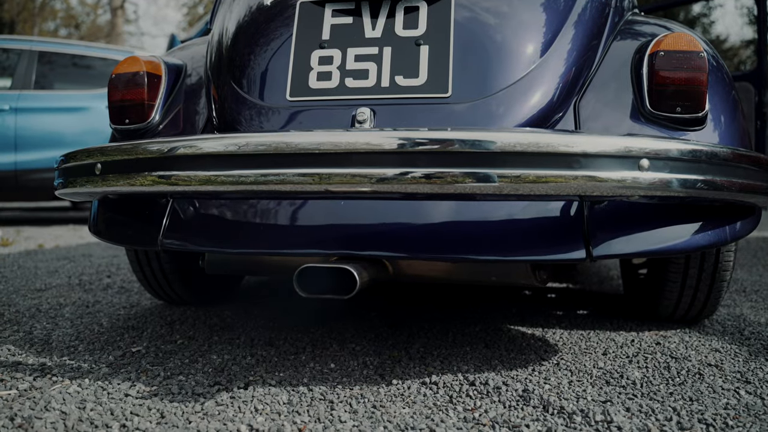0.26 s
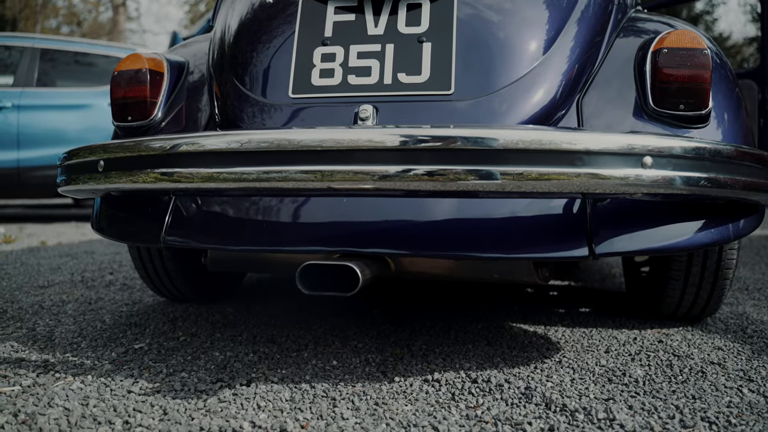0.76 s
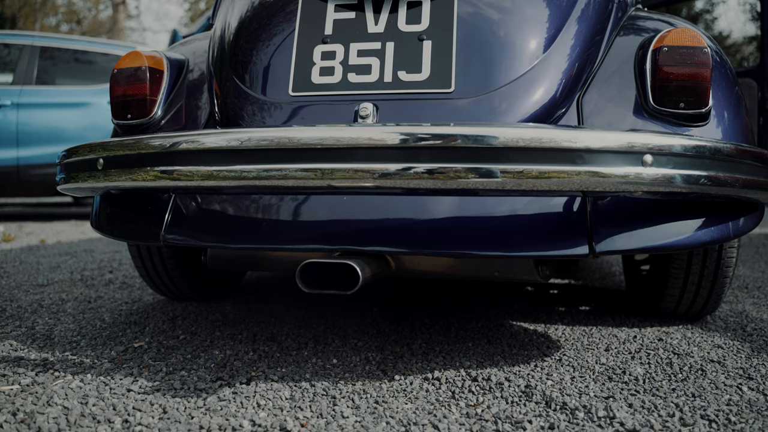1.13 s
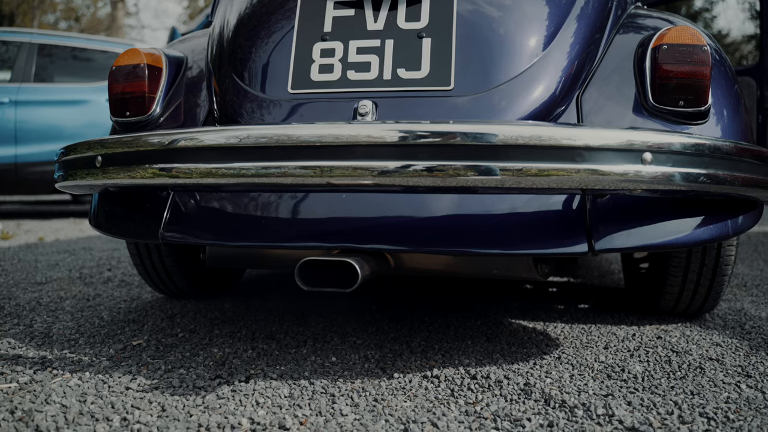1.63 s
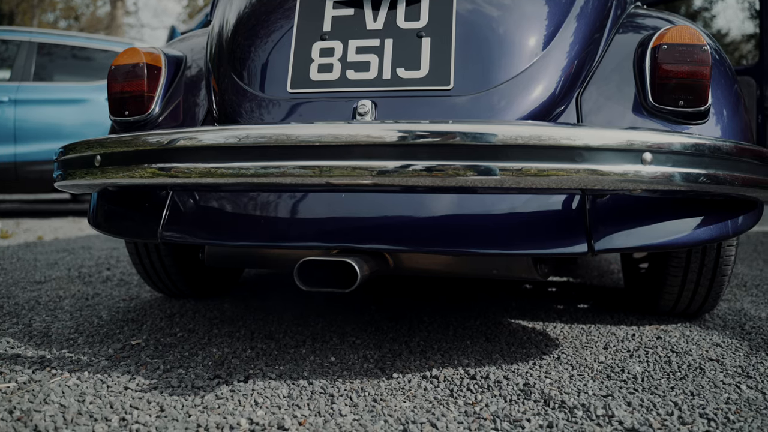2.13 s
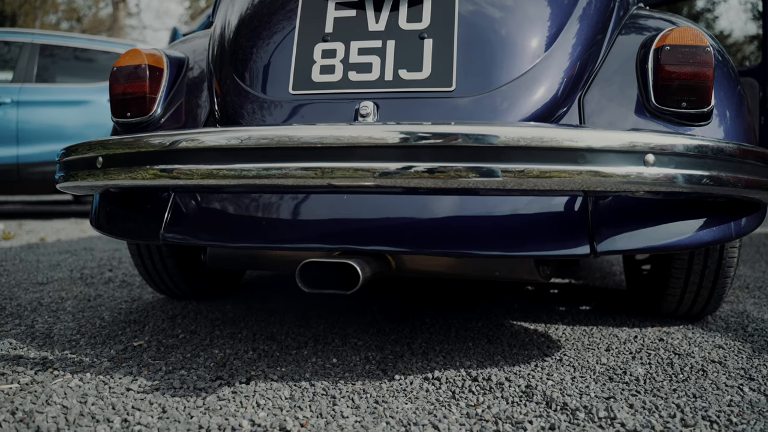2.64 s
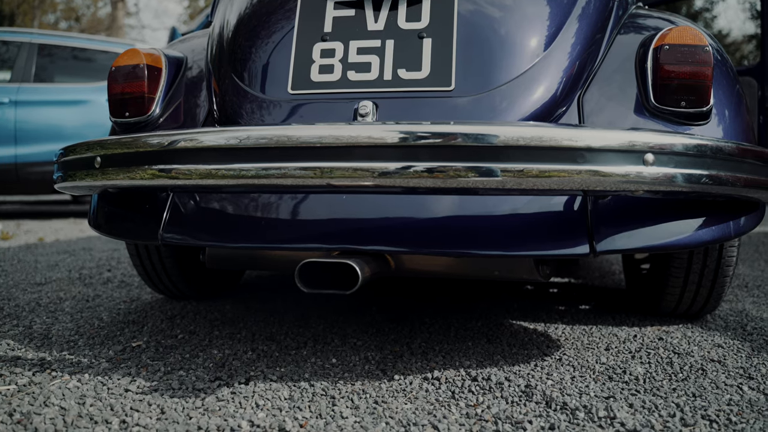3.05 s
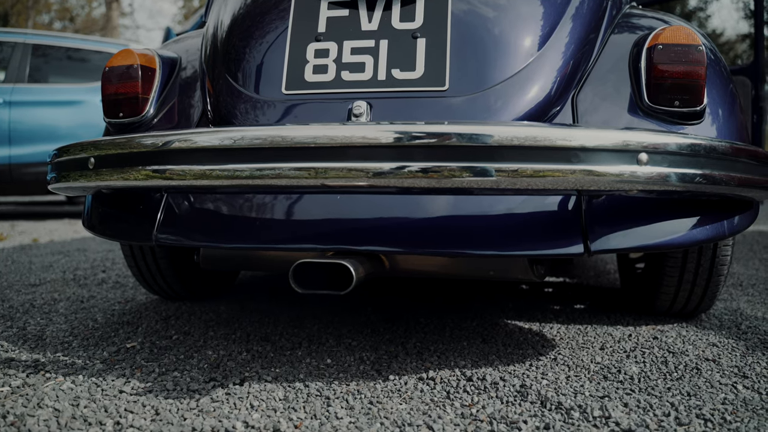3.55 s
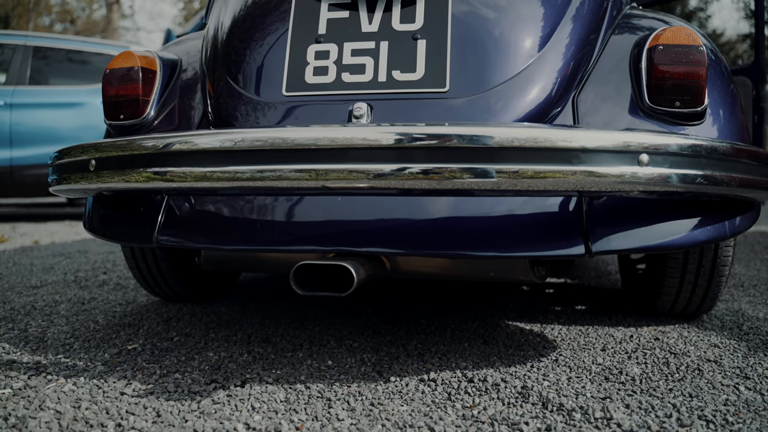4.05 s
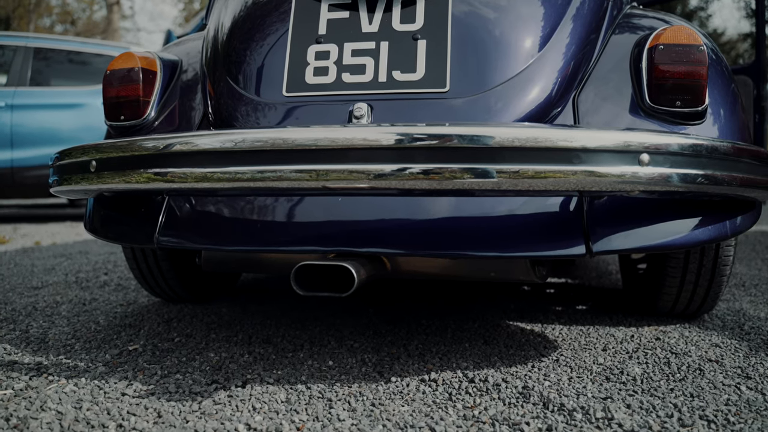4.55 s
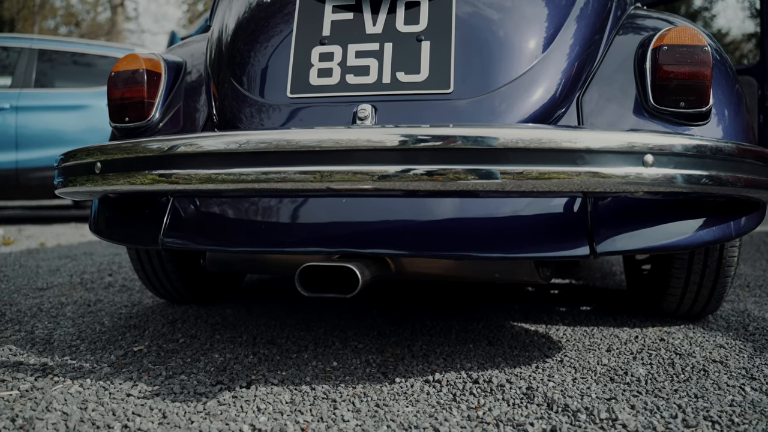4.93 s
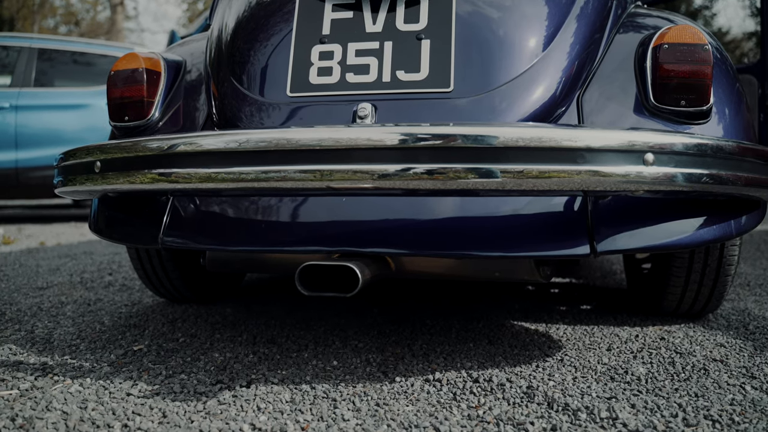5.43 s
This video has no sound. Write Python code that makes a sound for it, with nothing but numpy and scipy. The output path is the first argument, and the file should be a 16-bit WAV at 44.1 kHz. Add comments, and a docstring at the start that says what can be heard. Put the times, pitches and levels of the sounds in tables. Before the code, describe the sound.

An old air-cooled car engine heard close at the tailpipe revs up, drops abruptly as the throttle shuts, then settles into a lumpy idle.

```python
"""Flat-four engine at the tailpipe

An air-cooled engine is heard close up: the revs rise from idle, drop as the throttle shuts, and settle.
Each exhaust valve lets a puff into the silencer, which booms differently for the two pipe branches.
Each puff also rings a short chamber, knocks the sheet metal and rasps as gas noise in the tailpipe.
Some firings are weak or missed, and some of these suck gas back. Clatter, thin tones and a low rumble
lie underneath.
"""
import sys
import numpy as np
from scipy import signal
from scipy.fft import rfft, irfft
from scipy.io import wavfile
from scipy.ndimage import uniform_filter1d

SR = 44100
rng = np.random.default_rng(int(sys.argv[2]) if len(sys.argv) > 2 else 0)


def wav_record(signal):
    """Record a signal, one row per channel, as 16-bit PCM in the file named by sys.argv[1]."""
    frames = np.transpose(np.atleast_2d(signal))
    bounded = np.clip(frames, -1, 1)
    # unit amplitude maps onto the largest positive 16-bit level
    quanta = np.round(bounded * 32767).astype(np.int16)
    wavfile.write(sys.argv[1], SR, quanta)


N = 250488

SHUT_S, OPEN_S = 1.815, 2.05  # when the throttle starts to shut and to reopen [s]
IDLE_RPM = 1140  # reference speed for puff strength and gas heat [rpm]
SAG_RPM = 1151.6  # below this speed the chamber and the clatter get quieter [rpm]


def gain_of(db):
    """Turns decibels into a plain multiplier."""
    return 10 ** (np.asarray(db) / 20)


def evened(x):
    """Scales a sound to an average (rms) level of 1."""
    return x / np.sqrt(np.mean(x ** 2) + 1e-20)


def read(points, hz):
    """Reads a spectrum table between its points, on a logarithmic frequency axis."""
    f, value = np.transpose(points)
    return np.interp(np.log(hz + 1), np.log(f + 1), value)


def follow(points):
    """Draws a curve through (time, value) points, one value per sample."""
    seconds, value = np.transpose(points)
    return np.interp(np.arange(N) / SR, seconds, value)


def clicks(at, size):
    """Places single-sample clicks at the given samples."""
    out = np.zeros(N)
    out[at] = size
    return out


def ring(x, hz, width):
    """Each click starts a dying sine, the imaginary part of the result; the pitch may drift."""
    turn = np.exp(2j * np.pi * np.cumsum(hz * np.ones(N)) / SR)
    return turn * signal.lfilter([1], [1, -np.exp(-np.pi * width / SR)], x / turn)


def fade(x, ms):
    """Smooths a signal, so that a click dies away with this time constant."""
    r = np.exp(-1 / (ms / 1000 * SR))
    return signal.lfilter([1 - r], [1, -r], x)


def peaks(modes, hz):
    """Gain of a set of resonances: each lets through most at its own pitch."""
    return np.sqrt(sum(gain_of(2 * db) / (1 + (2 * (hz - f) / w) ** 2) for f, w, db in modes))


def turbulence(gate, colour):
    """Stereo noise of swirling air: two partly alike noises, gated in time, then coloured."""
    # how alike left and right are: (frequency [Hz], likeness [0 to 1])
    likeness = [(60, 1.0), (150, 0.14), (380, 0.84), (950, 0.46), (2380, 0.92), (5980, 0.18),
                (15000, 0.077)]
    hz = np.fft.rfftfreq(N, 1 / SR)
    a, b = rfft(gate * rng.standard_normal((2, N)))
    same = np.clip(read(likeness, hz), 0, 1)
    mid, side = np.sqrt(1 + same), np.sqrt(1 - same)
    pair = np.array([mid * a + side * b, mid * a - side * b])
    return evened(irfft(colour(hz) * pair, N))


def burst(at, size, rise_ms, fall_ms, rest):
    """Gas speed after each valve opening: quick rise, slower fall, never quite still."""
    gate = fade(fade(clicks(at, size), rise_ms), fall_ms)
    return evened(gate) + rest


def crank_rpm():
    """Crank speed at every sample, in turns per minute."""
    # (time [s], speed [rpm])
    speed = [(0.0, 1187.0), (0.38, 1224.0), (0.84, 1491.5), (0.98, 1476.5), (1.3, 1519.7), (1.76, 1538.0),
             (1.88, 1378.7), (2.2, 1149.8), (2.32, 1115.3), (3.3, 1086.7), (3.82, 1165.6), (4.22, 1108.1),
             (4.62, 1185.1), (5.02, 1161.2), (5.4, 1195.8), (5.68, 1158.4)]
    return follow(speed)


def shut():
    """How far the throttle is shut, 0 to 1."""
    shutting_s, opening_s = 0.028, .012  # time each move takes
    t = np.arange(N) / SR
    return np.clip((t - SHUT_S) / shutting_s, 0, 1) - np.clip((t - OPEN_S) / opening_s, 0, 1)


def charge_now():
    """Puff strength: a little weaker at high revs, sucking back (negative) with the throttle shut."""
    idle_charge, charge_per_rpm, shut_charge = 1.022, -.00065, -0.8
    running = idle_charge + charge_per_rpm * (crank_rpm() - IDLE_RPM)
    return running + (shut_charge - running) * shut()


def gas_heat():
    """Factor on the pipe pitches: hotter gas at high revs, cooler with the throttle shut."""
    return 1 + .00015 * (crank_rpm() - IDLE_RPM) + .09 * np.minimum(charge_now(), 0)


def firings():
    """Each firing's sample, pipe branch, puff and gains (ring, knock, rasp), timed by the crank."""
    # in firing order: (pipe delay [ms], puff size [factor], ring [dB], knock [dB], rasp [dB])
    cylinders = [(-1.03, 1, -1, -1, -1), (-1.02, 1, 0, -1, -1), (-1.32, .8, 0, 3, 0), (-1.44, 1, 1, 1.5, 2)]
    # weak or missed firings: (time [s], charge [below 0 sucks back], rasp change [dB], ring change [dB])
    misses = [(.045, -0.76, -28, -7), (.243, -1, -18, -2), (.34, -0.93, -18, 1), (1.451, 0.43, -6, 1),
              (1.74, 0.76, -14, 4.5), (2.094, 0.013, -11, -20), (2.3, -0.68, -10, 3),
              (2.52, 0.46, -25, 9.5), (2.735, 1, -6.5, 0), (2.954, 0.01, -21, 7.5), (3.174, -0.8, -8, 0),
              (3.502, -0.89, -31, 4.5), (4.963, 0.79, -14, 4.5)]
    first_firing = .34  # share of a firing interval already run at the start
    miss_late_ms = 0.633  # delay for each unit of charge lost
    count = first_firing + np.cumsum(crank_rpm() / 30) / SR  # two firings a turn
    number = np.arange(1, int(count[-1]) + 1)
    cylinder = np.array(cylinders)[number % len(cylinders)]
    at = np.searchsorted(count, number) + cylinder[:, 0] * SR / 1000
    at = np.clip(at, 0, N - 1).astype(int)
    charge, rasp_db, ring_db = charge_now()[at], np.zeros(len(at)), np.zeros(len(at))
    for s, left, rasp_change, ring_change in misses:
        k = np.argmin(abs(at - s * SR))
        at[k] += int(miss_late_ms * (1 - left) * SR / 1000)
        charge[k], rasp_db[k], ring_db[k] = left, rasp_change, ring_change
    # no two burns are alike
    chance = np.clip(rng.standard_normal((len(at), 4)), -1.6, 1.6)
    puff = charge * cylinder[:, 1] * gain_of(0.73 * chance[:, 0])
    change_db = np.array([ring_db, .5 * rasp_db, rasp_db]).T
    levels_db = cylinder[:, 2:] + change_db + [1.2, 2.2, 1.6] * chance[:, 1:]
    return at, number % 2, puff, gain_of(levels_db)


def rough_levels():
    """Chamber ring, shell knock and gas rasp in dB, from speed, gas flow and throttle."""
    # gas flow through the exhaust, cut sharply as the throttle shuts:
    # (time [s], level [dB], 0 being full flow)
    gas_flow = [(0, -4.5), (.35, -0.5), (1.0, -1), (1.6, -3), (1.825, -2.5), (1.84, -13.5), (2.08, -7.5),
                (2.15, -6.5), (3.3, -7), (4.4, -7.5), (4.85, -5), (5.68, -8)]
    flow_db = follow(gas_flow)
    # the ring is weaker at low speed and dies away while the throttle is shut, by 75 dB a second
    dying_db = -75 * shut() * (np.arange(N) / SR - SHUT_S)
    ring_db = -30 + 0.13 * np.minimum(crank_rpm() - SAG_RPM, 0) + dying_db
    knock_db = np.maximum(-32 + 0.84 * flow_db, -38)  # never below -38 dB
    rasp_db = -28.5 + flow_db
    return ring_db, knock_db, rasp_db


def rumble():
    """Distant low rumble of the yard: noise that weakens steeply above 35 Hz."""
    return turbulence(1, lambda hz: 1 / (1 + (hz / 35) ** 3))


def clatter():
    """Fan and valve gear: a steady coloured noise that thins as the idle sags."""
    # (frequency [Hz], relative noise level [dB])
    clatter_colour = [(130, -21), (220, 5), (331, -8.5), (607, 5.5), (726, -5.5), (1060, -10.5),
                      (1710, -12.5), (1930, -10.5), (2150, -7.5), (3360, -11.5), (3740, -18), (6610, -19.5),
                      (7490, -20), (9960, -26), (15600, -37)]
    sag_db = 0.05 * np.minimum(crank_rpm() - SAG_RPM, 0)
    return turbulence(gain_of(sag_db), lambda hz: gain_of(read(clatter_colour, hz)))


def whine():
    """Thin tones locked to the crank, louder at high revs; one more swells near a panel resonance."""
    # gear and fan tones: (multiple of crank speed [turns], level at 1500 rpm [dB])
    crank_tones = [(11, -44), (15, -43)]
    # tone that excites a body panel:
    # (multiple of crank speed [turns], panel pitch [Hz], width [Hz], level [dB])
    panel_tone = (28, 550, 20, -32)
    rpm = crank_rpm()
    turns = np.cumsum(rpm / 60) / SR
    tones = sum(gain_of(db) * np.sin(2 * np.pi * k * turns) for k, db in crank_tones)
    k, *panel = panel_tone
    panel_sound = peaks([panel], k * rpm / 60) * np.sin(2 * np.pi * k * turns)
    return (rpm / 1500) ** 7.9 * tones + panel_sound


def metal(modes, at, branch, size, rise_ms, fall_ms, rest, tick, uneven_db):
    """A tick and a burst of gas shake a metal part; every firing favours other modes."""
    # each part of the metal sounds from its own place: (frequency [Hz], lead of the left side [rad])
    left_lead = [(0, 0), (1030, 6), (1460, -0.12), (3450, 1.4), (3790, 1.8), (4570, 1), (5600, 2),
                 (6200, 1.42), (6980, 1.35), (8270, 7.5), (10200, 7.5), (15200, 8)]
    out = np.zeros((2, N))
    for hz, width, db, *second_db in modes:
        chance_db = uneven_db * rng.uniform(-1, 1, len(at))
        share = size * gain_of(sum(second_db) * (branch - .5) + chance_db)
        gas = burst(at, share, rise_ms, fall_ms, rest) * rng.standard_normal(N)
        drive = gas + tick * evened(clicks(at, share))
        # two resonators in a row; wide ones ring weakly and are raised
        shake = ring(ring(drive, hz, width).imag, hz, 3 * width) * width ** 1.43
        lead = np.exp(.5j * read(left_lead, hz))
        out += gain_of(db) * np.array([shake * lead, shake / lead]).real
    return evened(out)


def shell_knock(blow, branch, size):
    """Each blow of gas knocks the sheet metal, which rings briefly."""
    # sheet metal: (pitch [Hz], width [Hz], level [dB], second branch louder than the first by [dB])
    shell = [(1335, 71, -8, 8), (1718, 120, -3.5, 8), (2153, 136, 1.5, -3), (2316, 170, -2, -6),
             (2825, 180, -3.5, 0), (3383, 58, -8, 8)]
    return metal(shell, blow, branch, size, .4, 3.2, 0.77, 0.84, uneven_db=6.5)


def gas_rasp(blow, branch, size):
    """Gas rushing out after each firing hisses and shakes the tailpipe metal."""
    # colour of the hiss: (frequency [Hz], relative noise level [dB])
    hiss_colour = [(1760, -32), (3000, -4), (3690, -8), (4630, -4.5), (6400, 1.5), (8780, -0.5), (9870, -2),
                   (15600, -14)]
    # tailpipe metal: (pitch [Hz], width [Hz], level [dB])
    tailpipe = [(4230, 200, -9), (5250, 260, -8), (5610, 180, -5), (6450, 320, -2), (6980, 200, -5),
                (8300, 240, -7), (9650, 260, -6), (10150, 220, -8), (10600, 260, -10), (11200, 300, -11),
                (12500, 500, -14)]
    hiss = turbulence(burst(blow, size, 2.6, 13.2, 0.026), lambda hz: gain_of(read(hiss_colour, hz)))
    shaken = metal(tailpipe, blow, branch, size, 1.0, 8.2, 0.24, 0.38, uneven_db=13.0)
    return 0.86 * hiss + 0.89 * shaken


def chamber(at, blow, branch, size):
    """The front of each puff strikes the short chamber; swirling gas keeps it humming in between."""
    # (pitch [Hz], width [Hz], signed drive from the first branch [factor], from the second [factor])
    chamber_modes = [(268, 33, 0.046, -0.15), (384.4, 12.6, 0.036, 0.11), (463, 38, 0.56, -0.35),
                     (552.8, 15, -0.15, 0.16), (599.4, 18.4, 1, 0.66), (641.3, 19.6, -1.09, 0.53),
                     (795.3, 18.5, 0.24, 0.3)]
    heat = gas_heat() ** 0.35
    jitter = (.0002 * SR * rng.standard_normal(len(at))).astype(int)  # about 0.2 ms either way
    strike_at = np.clip(at + jitter, 0, N - 1)
    struck = np.zeros(N)
    for hz, width, *drive in chamber_modes:
        strike = clicks(strike_at, size * np.array(drive)[branch])
        struck += ring(strike, hz * heat, width).imag
    hum_modes = [(hz, width, 10 * np.log10(a * a + b * b)) for hz, width, a, b in chamber_modes]
    hum = turbulence(burst(blow, size, 1.4, 1.8, 1.0), lambda hz: peaks(hum_modes, hz) ** 2)
    return evened(evened(fade(struck, 0.4)) + 0.74 * hum)


def boom(at, branch, puff):
    """Puffs ring the long modes of the silencer; a soft push of the pistons comes between firings."""
    # (pitch [Hz], width [Hz], signed drive from the first branch [factor], from the second [factor])
    silencer = [(40.3, 8.0, -0.314, -0.612), (63.5, 43.8, 1.867, 3.11), (133.9, 59.7, 0.572, -1.578),
                (143.5, 12.5, -0.004, 0.566), (190.6, 26.3, -0.397, 0.184)]
    heat = gas_heat()
    interval = SR * 30 / crank_rpm()[at]  # samples from one firing to the next
    push_at = np.maximum(at - .44 * interval, 0).astype(int)
    flow = np.zeros(N)
    for hz, width, *drive in silencer:
        side = np.array(drive)[branch]
        push = clicks(push_at, .175 * side)
        push = uniform_filter1d(uniform_filter1d(push, size=150), size=150)
        flow += ring(clicks(at, puff * side) + push, hz * heat, width).imag
    smooth_flow = fade(fade(flow, 1.045), 1.045)
    # the pipe mouth radiates the change of flow, here per millisecond
    return np.gradient(smooth_flow) * SR / 1000


def scene():
    """Adds the background, the rough exhaust sounds and the boom."""
    at, branch, puff, size = firings()
    ring_db, knock_db, rasp_db = rough_levels()
    # the valve's blow reaches the metal 2.3 ms before the boom leaves the pipe
    blow = np.maximum(at - int(2.3 * SR / 1000), 0)
    background = gain_of(-50) * rumble() + gain_of(-31.5) * clatter() + whine()
    rough = gain_of(knock_db) * shell_knock(blow, branch, size[:, 1])
    rough += gain_of(rasp_db) * gas_rasp(blow, branch, size[:, 2])
    rough += gain_of(ring_db) * chamber(at, blow, branch, size[:, 0])
    return background + rough + boom(at, branch, puff)


def record(dry):
    """The microphone pair drops the deepest bass and leans left or right by pitch; then the treble ends."""
    # (frequency [Hz], left minus right [dB])
    lean = [(60, -1.5), (120, -5), (240, -2.5), (480, -3), (950, -0.5), (1890, -2), (3770, -2), (7520, 2),
            (15000, -3.5)]
    lean_db = read(lean, np.fft.rfftfreq(N, 1 / SR)) / 2
    pair = irfft(rfft(dry) * gain_of([lean_db, -lean_db]), N)
    pair = signal.lfilter(*signal.butter(1, 8, "high", fs=SR), pair)  # 8 Hz bass limit
    treble_limit = signal.firwin(2047, 15750, window=("kaiser", 9), fs=SR)
    return signal.oaconvolve(pair, treble_limit[None], "same")


dry = scene()
out = record(dry)
wav_record(out)
```